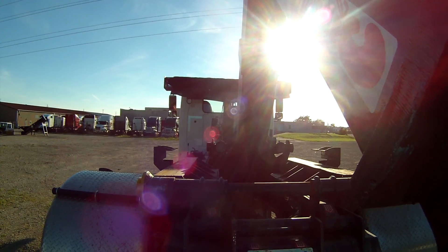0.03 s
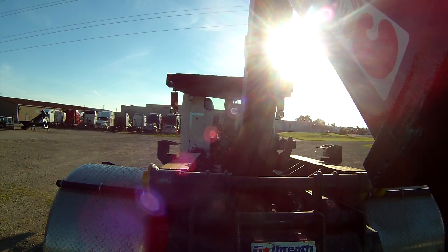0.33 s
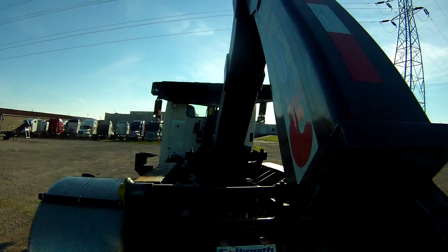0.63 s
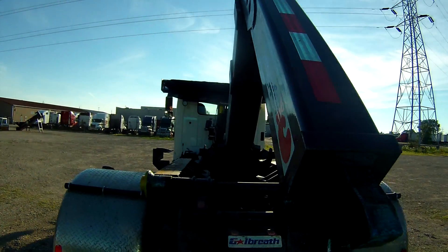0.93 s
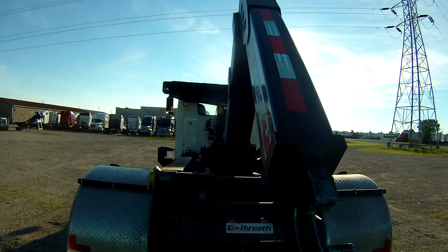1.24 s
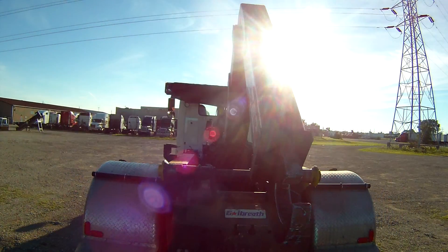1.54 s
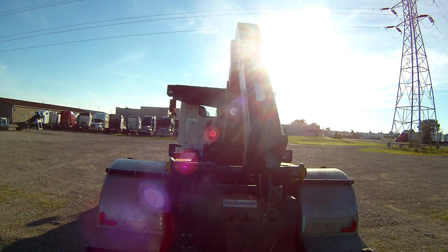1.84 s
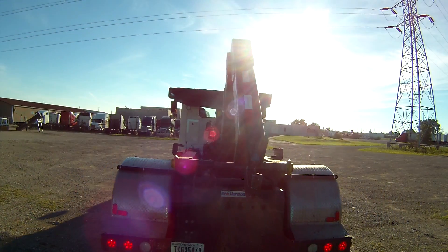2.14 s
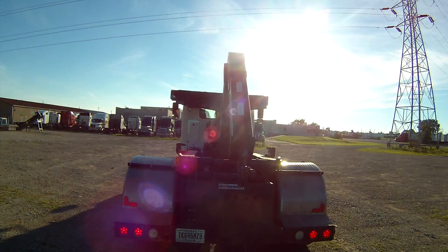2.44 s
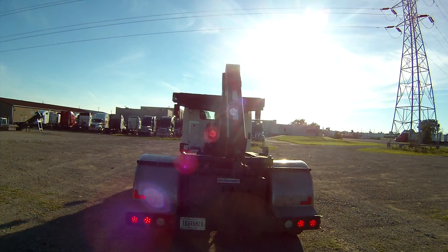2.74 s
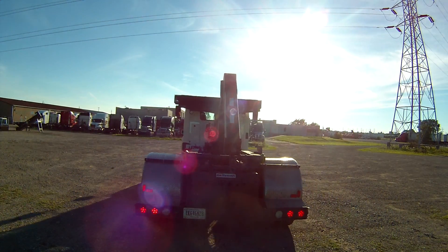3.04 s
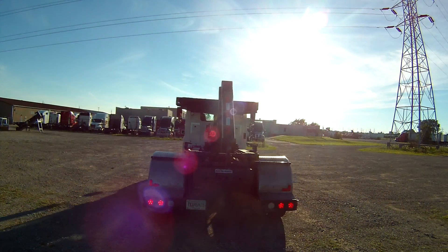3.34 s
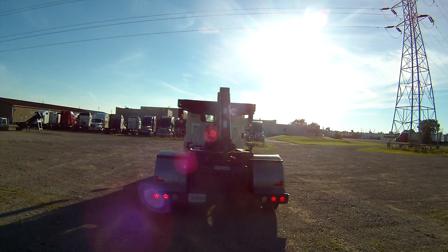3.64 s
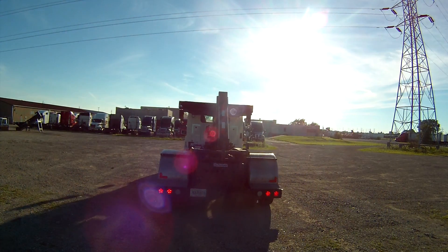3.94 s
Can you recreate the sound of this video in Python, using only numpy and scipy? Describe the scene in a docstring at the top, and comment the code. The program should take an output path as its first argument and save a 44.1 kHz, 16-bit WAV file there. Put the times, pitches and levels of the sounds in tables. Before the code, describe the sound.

A steel dumpster clanks loudly at about 0.8 seconds, amid a few sharp, dry ticks, after a truck's hook squeaks along its bar and the diesel speeds up. Grinding lasts until 1.1 seconds, and the empty box booms on, fading after 2 seconds. The truck drones and hisses away over gravel, with light chassis knocks from 2.6 seconds. Near 3.6 seconds a gust bumps the microphone.

```python
"""A hooklift truck lets go of a steel dumpster and drives off across a gravel yard.
As the diesel speeds up, the hook squeaks and grinds along the lifting bar by stick-slip friction.
At 0.8 s it slips with a loud clank, amid dry digital ticks of the recorder, and the empty box booms on.
The truck drones and hisses away, its chassis knocks, and near 3.6 s a gust bumps the microphone
of a small camera, whose low sampling rate mirrors the sound into the treble."""
import sys
import numpy as np
from scipy import signal
from scipy.fft import rfft, irfft
from scipy.io import wavfile
from scipy.ndimage import uniform_filter1d

SR = 44100
rng = np.random.default_rng(int(sys.argv[2]) if len(sys.argv) > 2 else 0)


def output_pcm(signal):
    """Save a mono or channel-first signal as 16-bit PCM at the path in sys.argv[1].

    Samples are clipped to [-1, 1] before scaling.
    """
    pcm = np.clip(np.atleast_2d(signal).T, -1, 1) * 32767
    wavfile.write(sys.argv[1], SR, np.round(pcm).astype(np.int16))


N = 176400
T = np.arange(N) / SR
BIN_HZ = np.arange(N // 2 + 1) * SR / N

# modes of the steel bar and box: pitch_hz, level_db, t60_s
STEEL_MODES = [(115.4, -5, 0.76), (342.4, -8.5, 0.31), (370, -3.5, 0.17), (602, -6.5, 0.32),
               (725, -24, 0.81), (970, -8.5, 0.4), (1058, -8, 0.62), (1207, 1.5, 0.093), (1431, -12, 0.39),
               (1622, -5.5, 0.18), (1790, 1.5, 0.071), (1923, -2, 0.11), (2258, -3, 0.042),
               (2480, -12.5, 0.087), (3190, -17, 0.32), (3400, -17, 0.14)]
# spectrum of the steel's dense upper modes: frequency_hz, level_db
CRASH_SPECTRUM = [(100, -41), (350, 5.5), (800, 4.5), (1200, 1.5), (1900, -3.5), (2300, -8), (3500, -14),
                  (5500, -13.5)]
# blows of the hook: start_s, level_db
HOOK_BLOWS = [(0.655, -41), (.779, -22), (.7825, -17), (.789, -19), (0.8, -40), (.832, -25)]
# spectrum of small impacts, of gravel and on the chassis: frequency_hz, level_db
IMPACT_SPECTRUM = [(200, -42), (500, 10), (1000, -7), (1700, -2), (2700, -11), (4000, -13), (6000, -12.5)]


def from_db(db):
    """Decibels to amplitude ratio."""
    return 10 ** (np.asarray(db) / 20)


def rms_one(x):
    """Normalisation to unit rms."""
    return x / np.sqrt(np.mean(x ** 2) + 1e-20)


def in_time(rows):
    """Linear interpolation of (time_s, value) rows."""
    return np.interp(T, *np.transpose(rows))


def colour(x, spectrum):
    """Spectral shaping by (frequency_hz, level_db) rows on a logarithmic frequency axis; rms 1."""
    hz, db = np.transpose(spectrum)
    gain = from_db(np.interp(np.log(BIN_HZ + 1), np.log(hz), db))
    return rms_one(irfft(rfft(x) * gain, N))


def noise(spectrum):
    """Gaussian noise with a given spectrum; rms 1."""
    return colour(rng.standard_normal(N), spectrum)


def even(x, span_s):
    """Division by the running rms takes the slow swings out of a random signal."""
    power = np.abs(uniform_filter1d(x * x, int(span_s * SR)))
    return x / np.sqrt(power + 1e-9)


def grains(per_s, spread_db):
    """A Poisson train of impulses of uneven size and random sign."""
    sizes = from_db(spread_db * np.minimum(rng.exponential(1, N), 3)) * rng.choice([-1, 1], N)
    return sizes * (rng.random(N) < per_s / SR)


def ring(x, hz, t60_s):
    """A damped resonator: a unit impulse starts a decaying sine of height 1."""
    r, w = from_db(-60 / (t60_s * SR)), 2 * np.pi * hz / SR
    return signal.lfilter([0, np.sin(w)], [1, -2 * r * np.cos(w), r * r], x + 1e-18)


def clicks(rows):
    """One impulse for each (start_s, level_db) row."""
    out = np.zeros(N)
    for start_s, db in rows:
        out[int(start_s * SR)] += from_db(db)
    return out


def decays(rows, decay_s):
    """An envelope that jumps at each (start_s, level_db) row and decays exponentially."""
    return signal.lfilter([1], [1, -np.exp(-1 / (decay_s * SR))], clicks(rows))


def swell(centre_s, length_s, db):
    """A Gaussian envelope."""
    return from_db(db) * np.exp(-(2 * (T - centre_s) / length_s) ** 2)


def whistle(hz, width_hz):
    """A random walk of phase broadens a sine into a spectral line of the given width; rms 1."""
    wander = np.cumsum(rng.standard_normal(N)) * np.sqrt(2 * np.pi * width_hz / SR)
    return np.sqrt(2) * np.sin(2 * np.pi * np.cumsum(hz + np.zeros(N)) / SR + wander)


def singing(modes):
    """Self-sustained oscillation: friction keeps several modes sounding together."""
    return sum(from_db(db) * whistle(hz, width_hz) for hz, width_hz, db in modes)


def panels(x, decay_s=0.012, ring_db=-1):
    """Convolution with the short, dense impulse response of the truck's metalwork; rms 1."""
    t = T[:SR // 4]
    response = rng.standard_normal(len(t)) * np.exp(-t / decay_s)
    return rms_one(x + from_db(ring_db) * rms_one(signal.fftconvolve(x, response)[:N]))


def wind():
    """Turbulent pressure on the microphone: gusts of low noise and single push-pull pulses."""
    # pressure pulses: centre_s, level_db, width_s
    thuds = [(1.122, -8.5, 0.0025), (1.491, -5.5, 0.0014), (3.410, -18, 0.001), (3.446, -20, 0.0008),
             (3.504, -16, 0.00084), (3.573, -14, .0011), (3.579, -22, 0.00043), (3.593, -15.5, 0.0011),
             (3.596, -23.5, 0.0003), (3.646, -20, 0.00085)]
    # gusts: centre_s, length_s, level_db
    gusts = [(3.567, 0.27, -30.5), (3.581, 0.025, -23), (3.873, 0.083, -37.5)]
    # gust spectrum: frequency_hz, level_db
    spectrum = [(40, -14), (120, 5), (220, 2.5), (350, -10), (600, -23), (1200, -29), (3000, -65)]
    out = even(noise(spectrum), span_s=0.0194) * sum(swell(*gust) for gust in gusts)
    for centre_s, db, width_s in thuds:
        u = (T - centre_s) / width_s
        out += from_db(db) * u * np.exp((1 - u * u) / 2)
    return out


def recorder_ticks():
    """Sharp, dry digital ticks of the recorder around the clank: so brief a pulse is broadband."""
    # digital ticks: start_s, level_db
    ticks = [(.732, -10), (.7412, -10), (.7558, -9), (.7696, -27), (.8374, -4), (.8401, -4), (.8504, -21)]
    highpass = signal.butter(2, 1500, "high", fs=SR, output="sos")
    return signal.sosfilt(highpass, ring(clicks(ticks), hz=4600, t60_s=0.0013))


def rumble():
    """Low-frequency random pressure from truck and wind."""
    # rumble envelope: time_s, level_db
    level = [(0, -34), (.5, -31), (.68, -26), (.8, -20), (.92, -23), (1.1, -19.5), (1.2, -24), (1.48, -21),
             (1.65, -19.5), (2.2, -24.5), (2.6, -26), (3.1, -30.5), (3.35, -27.5), (3.58, -19),
             (3.72, -26.5), (4, -30.5)]
    # rumble spectrum: frequency_hz, level_db
    spectrum = [(15, -40), (27, -22), (40, 0.5), (52, -8), (68, -2), (95, -6), (130, -8.5), (200, -17.5),
                (400, -39.5), (900, -76)]
    return from_db(in_time(level)) * even(noise(spectrum), span_s=0.079)


def engine_cycle(throb_depth=0.21):
    """Phase is the integral of frequency: the running count of firings, and a gain pulsing with it."""
    # engine speed: time_s, firing_rate_hz
    firing_rate = [(0, 68), (.6, 75), (1.1, 77), (1.35, 81.5), (2.4, 81.2), (3, 80.5), (4, 81.5)]
    firings = np.cumsum(in_time(firing_rate)) / SR
    return firings, 1 + throb_depth * np.cos(2 * np.pi * firings)


def turbo():
    """The turbocharger radiates one thin, wavering spectral line."""
    # whistle contour: time_s, pitch_hz, level_db
    contour = [(1.1, 5380, -80), (1.25, 5400, -51), (1.45, 5300, -67), (1.58, 5500, -55),
               (1.851, 5255, -58), (2.1, 5450, -51), (2.43, 5030, -55), (2.85, 5180, -59.5),
               (3.25, 5430, -53), (3.6, 5500, -56.5), (3.95, 5590, -59)]
    time_s, hz, db = np.transpose(contour)
    return from_db(np.interp(T, time_s, db)) * whistle(np.interp(T, time_s, hz), width_hz=39)


def air_hiss(throb):
    """Flow noise, amplitude-modulated by the firings and coloured by the panels."""
    # hiss envelope: time_s, level_db
    level = [(0, -65), (.5, -49), (1.17, -50.5), (1.3, -43), (1.47, -40), (1.56, -45), (1.8, -46.5),
             (2.08, -36.5), (2.28, -40.5), (2.45, -40), (2.7, -43), (3.25, -45), (3.65, -48), (4, -39)]
    # hiss spectrum: frequency_hz, level_db
    spectrum = [(500, -6), (1500, -4), (3000, -10.5), (4000, -11), (4700, 1), (5300, 5), (6000, -1.5)]
    return from_db(in_time(level)) * panels(noise(spectrum) * throb)


def clatter_and_gravel(throb):
    """Engine noise modulated at the firing rate, with random impacts of gravel under the tyres."""
    # envelope of both: time_s, level_db
    level = [(0, -45), (.25, -43.5), (.36, -45.5), (.5, -39.5), (1.15, -46), (1.45, -45.5), (1.65, -44.5),
             (2.05, -41), (2.5, -41), (3.3, -41.5), (3.75, -41.5), (4, -42)]
    # clatter spectrum: frequency_hz, level_db
    spectrum = [(60, 6), (200, 0), (400, 2.5), (600, -4.5), (1000, -6), (1700, -10.5), (2500, -13.5),
                (4000, -16.5), (6000, -17)]
    clatter = panels(noise(spectrum) * throb)
    gravel = from_db(-9) * colour(grains(per_s=160, spread_db=3.5), IMPACT_SPECTRUM)
    return from_db(in_time(level)) * (clatter + gravel)


def exhaust(firings):
    """A periodic source: the drone consists of harmonics of the engine's cycle of six firings."""
    # drone envelope: time_s, level_db
    level = [(0, -55), (.5, -33.5), (.7, -20), (.9, -26), (1.2, -24.5), (1.35, -19), (1.75, -18),
             (1.95, -27), (2.2, -16.5), (2.4, -19), (2.57, -41.5), (2.72, -20.5), (2.95, -20),
             (3.08, -35.5), (3.25, -28.5), (3.6, -21.5), (3.75, -37), (4, -30.5)]
    # exhaust partials: harmonic_number, level_db
    partials = [(3, -12), (5, -7.5), (6, 1.5), (9, -13), (12, -32), (15, -22)]
    drone = sum(from_db(db) * np.sin(2 * np.pi * (k * firings / 6 + rng.random())) for k, db in partials)
    return from_db(in_time(level)) * rms_one(drone)


def chassis_knocks():
    """Impulse excitation: loose parts tap the chassis, ringing its modes with a puff of noise."""
    # taps: start_s, level_db
    taps = [(1.092, -34.5), (2.573, -35.5), (2.648, -42), (2.81, -40), (3.027, -40), (3.135, -36),
            (3.256, -42), (3.37, -31), (3.389, -35)]
    # chassis modes: pitch_hz, level_db, t60_s
    modes = [(676, 3, 0.064), (954, 0, 0.05), (1200, -5, 0.12), (1555, -2, 0.08), (1708, 0.5, 0.067),
             (2590, -5, 0.043), (3000, -5.5, 0.067)]
    ringing = np.zeros(N)
    for k, (hz, db, t60_s) in enumerate(modes):
        force = clicks([(start_s, tap_db + rng.normal(0, 1.5)) for start_s, tap_db in taps])
        ringing += (-1) ** k * from_db(db) * ring(force, hz, t60_s)
    puffs = decays(taps, decay_s=0.011) * noise(IMPACT_SPECTRUM)
    return from_db(-6) * ringing + from_db(-0.5) * puffs


def hook_squeaks():
    """Friction under the shifting load gives short rasping squeals and toneless scuffs."""
    # hook modes: pitch_hz, width_hz, level_db
    modes = [(1947, 35, 0), (2280, 120, -15), (3090, 90, -10.5), (3620, 63, -14.5), (4580, 34, -11.5),
             (4950, 48, -12.5)]
    # rasp spectrum: frequency_hz, level_db
    spectrum = [(800, -27), (2000, -1), (2900, -3.5), (3700, -5.5), (4700, -6), (6000, -9)]
    # squeaks: centre_s, length_s, tone_db, rasp_db
    squeaks = [(0.447, 0.017, -41.5, -42), (0.544, .032, -41, -41), (0.58, 0.016, -39.5, -46),
               (0.614, 0.031, -34, -42), (.640, 0.008, -24.5, -32), (0.656, 0.021, -32, -22),
               (0.683, 0.038, -34, -34)]
    # scuffs of hook and lifting gear: centre_s, length_s, level_db
    scuffs = [(0.156, 0.081, -44.5), (0.244, 0.077, -45.5), (0.373, 0.066, -44.5), (1.303, 0.046, -46.5),
              (1.476, .06, -43)]
    tone = singing(modes)
    rasp = colour(grains(per_s=2200, spread_db=4.5), spectrum)
    squeals = sum(swell(centre_s, length_s, tone_db) * tone + swell(centre_s, length_s, rasp_db) * rasp
                  for centre_s, length_s, tone_db, rasp_db in squeaks)
    return squeals + rasp * sum(swell(*scuff) for scuff in scuffs)


def hook_grind(clear_s=1.124, release_s=0.006):
    """Stick-slip impulses drive the steel's modes, more damped here, until the hook comes clear."""
    # grinding envelope: time_s, level_db
    level = [(.3, -71), (.52, -57), (.6, -37), (.63, -41), (.655, -27), (.675, -57), (.695, -24),
             (.72, -54), (.77, -33), (.8, -17), (.85, -20.5), (.89, -27), (.94, -23.5), (.98, -30),
             (1.02, -26.5), (1.06, -30.5), (1.12, -33.5)]
    slips = grains(per_s=1600, spread_db=1)
    ringing = sum((-1) ** k * from_db(db) * ring(slips, hz, 0.4 * t60_s)
                  for k, (hz, db, t60_s) in enumerate(STEEL_MODES))
    ringing = rms_one(signal.sosfilt(signal.butter(2, 1200, fs=SR, output="sos"), ringing))
    grit = colour(slips, CRASH_SPECTRUM)
    contact = np.exp(-np.maximum(T - clear_s, 0) / release_s)
    return contact * from_db(in_time(level)) * (from_db(-6.5) * ringing + from_db(-0.5) * grit)


def box_groan():
    """Friction of the dragging hook sustains the lowest modes of the box walls."""
    # groans: centre_s, length_s, level_db
    groans = [(0.666, 0.084, -16.5), (0.78, 0.1, -17.5), (0.95, 0.1, -27)]
    # wall modes: pitch_hz, width_hz, level_db
    modes = [(111.5, 9.1, -0.5), (324.7, 38, -6.5), (368.5, 21.9, -5.5), (614, 10, -28)]
    return sum(swell(*groan) for groan in groans) * singing(modes)


def box_boom(pivot_hz=205, dulling_db_per_octave_s=7.5):
    """Overlapping wall modes merge into noise; damping rises with frequency, so the boom dulls."""
    # boom envelope: time_s, level_db
    level = [(0, -33), (.26, -40.5), (.36, -27.5), (.45, -38), (.56, -36.5), (.62, -26.5), (.66, -18.5),
             (.74, -22.5), (.8, -21.5), (.9, -22.5), (1.08, -18), (1.15, -26), (1.25, -20), (1.48, -26),
             (1.65, -27), (2, -27), (2.3, -41), (3, -41), (4, -61)]
    # wall spectrum: frequency_hz, level_db
    spectrum = [(60, -44), (105, 10), (150, 2.5), (240, 2), (350, -5), (480, -8), (650, -10.5),
                (900, -15.5), (1500, -24.5), (3000, -34)]
    walls = rfft(even(noise(spectrum), span_s=0.044))
    since_clank_s = np.clip(T - HOOK_BLOWS[-1][0], 0, 1.2)
    octave = np.clip(np.log2((BIN_HZ + 1) / pivot_hz), 0, 4)
    out = np.zeros(N)
    for k in range(5):
        band = irfft(walls * np.maximum(1 - abs(octave - k), 0), N)
        out += band * from_db(-dulling_db_per_octave_s * k * since_clank_s)
    return from_db(in_time(level)) * out


def clank():
    """Energy summation: rapid blows feed the steel's modes, each with a short crash of dense ones."""
    squared_blows = [(start_s, 2 * db) for start_s, db in HOOK_BLOWS]  # energy is amplitude squared
    ringing = np.zeros(N)
    for hz, db, t60_s in STEEL_MODES:
        energy = decays(squared_blows, decay_s=t60_s / np.log(1e6))
        ringing += from_db(db) * np.sqrt(energy) * whistle(hz, width_hz=10.4)
    crash = decays(HOOK_BLOWS, decay_s=0.017) * noise(CRASH_SPECTRUM)
    return from_db(-2) * ringing + from_db(0.5) * crash


def scene():
    """Superposition of truck, box, hook, wind and the recorder's ticks in one channel."""
    firings, throb = engine_cycle()
    truck = exhaust(firings) + clatter_and_gravel(throb) + rumble() + air_hiss(throb) + turbo()
    box = box_boom() + box_groan()
    hook = clank() + hook_grind() + hook_squeaks()
    return (truck + box + hook + chassis_knocks() + wind() + recorder_ticks())[None]


def record(dry, rate_hz=12000, overload=0.88):
    """Sample and hold: the camera samples slowly, clips, and mirrors the spectrum into the treble."""
    anti_alias = signal.butter(20, 5624, fs=SR, output="sos")
    slow = signal.resample(signal.sosfilt(anti_alias, dry), N * rate_hz // SR, axis=-1)
    clipped = np.clip(slow, -overload, overload)
    held = signal.resample(np.repeat(clipped, 4, axis=-1), N, axis=-1)
    top_cut = signal.ellip(12, 0.1, 90, 15500, fs=SR, output="sos")
    return signal.sosfilt(top_cut, held)


dry = scene()
out = record(dry)
output_pcm(out)
```